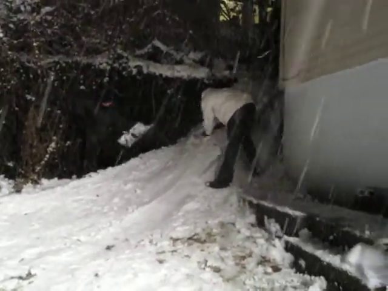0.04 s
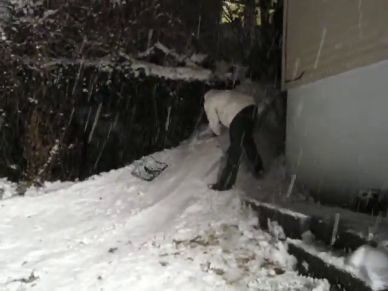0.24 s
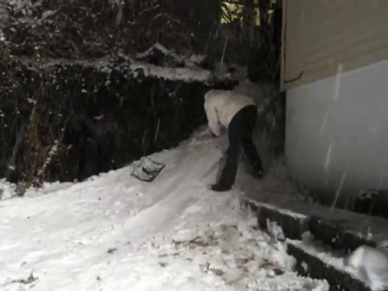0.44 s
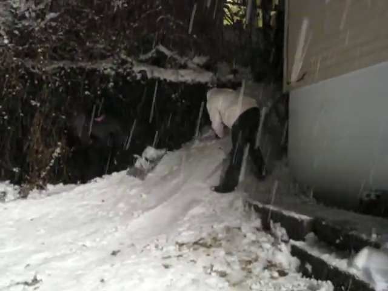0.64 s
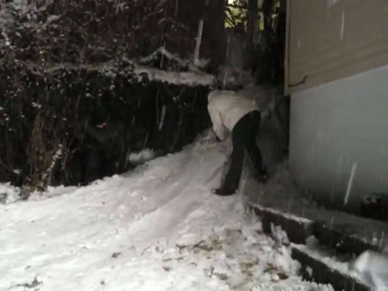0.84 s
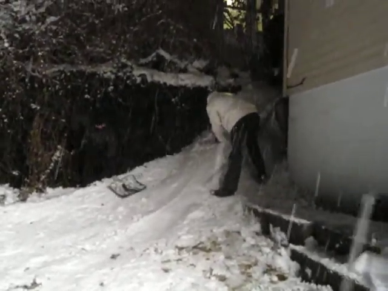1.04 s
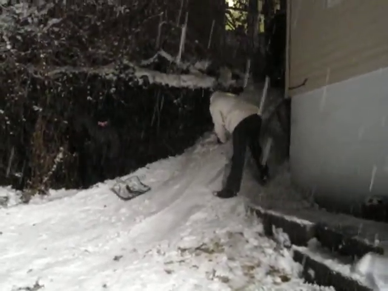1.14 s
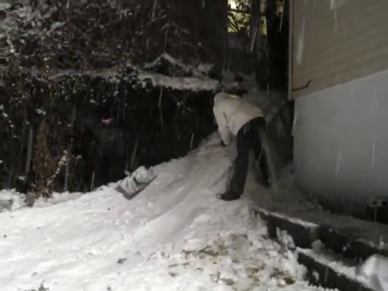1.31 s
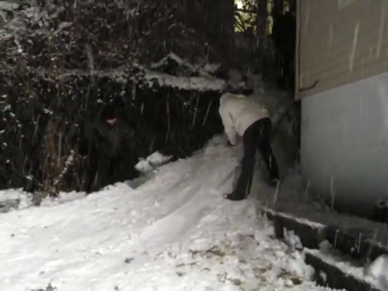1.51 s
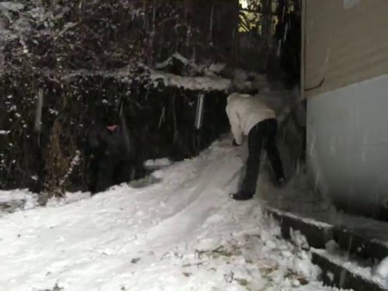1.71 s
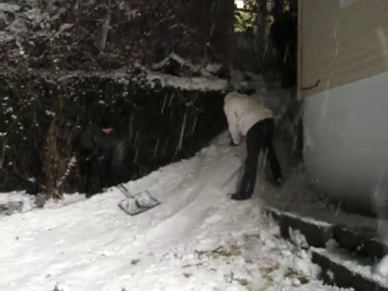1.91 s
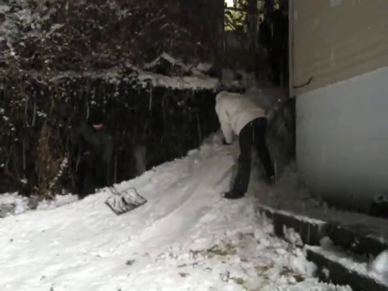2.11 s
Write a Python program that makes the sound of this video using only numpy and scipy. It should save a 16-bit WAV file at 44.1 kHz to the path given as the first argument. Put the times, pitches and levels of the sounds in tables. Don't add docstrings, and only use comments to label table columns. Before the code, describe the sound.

After a soft brush of loose snow, a very hard flat smack lands on a snow bank, then two crunchier blows with brief low rumble, faint pats between, a swish and light final pat, in quiet open air.

```python
import sys
import numpy as np
from scipy import signal
from scipy.fft import rfft, irfft, next_fast_len
from scipy.io import wavfile
from scipy.ndimage import map_coordinates

SR = 44100
rng = np.random.default_rng(int(sys.argv[2]) if len(sys.argv) > 2 else 0)


def decibels_to_gain(level_db):
    exponent = np.asarray(level_db, float) / 20
    return 10 ** exponent


def transcribe(u):
    v = np.clip(np.atleast_2d(u).T, -1, 1)
    q = np.round(v * 32767).astype(np.int16)
    wavfile.write(sys.argv[1], SR, q)


N = 94815

# frequency in Hz, level in dB per Hz.
NIGHT_TONE = [(90, -25), (150, -5), (300, -4), (600, -3.5), (900, -7), (1600, -9.5), (7600, -16),
              (16000, -28)]
# frequency in Hz, level in dB per Hz.
BREEZE_TONE = [(12, -14), (22, 0), (45, -2), (75, -4), (130, -11), (300, -20), (500, -40)]
# time in seconds, gain in dB.
AUTO_GAIN = [(0, 0), (.24, 0), (.33, -7), (.55, -9), (.9, -5), (1.1, -3), (1.4, -3), (1.8, -2), (2.15, 0)]
# start in seconds, level in dB, pitch in Hz, rise in seconds,
# fall to -60 dB in seconds.
HEAP_THUMPS = [(.004, -36, 135, .006, .08), (.2397, -.8, 188, .0006, .017), (.2447, -6, 185, .001, .009),
               (.2515, -21, 340, .001, .03), (.2645, -16, 215, .001, .013), (.9365, -8, 208, .001, .04),
               (.9368, -15, 470, .001, .02), (.9385, -20, 100, .002, .04), (.9555, -14, 325, .001, .035),
               (.982, -28, 195, .004, .075), (.958, -27, 50, .005, .06), (1.05, -34, 60, .01, .1),
               (1.232, -32, 200, .001, .015), (1.589, -31, 200, .001, .016), (1.762, -35, 230, .001, .016),
               (1.8314, -4.5, 340, .006, .03), (1.8325, -11, 105, .006, .045),
               (1.8375, -13, 175, .002, .022), (1.8535, -18, 250, .001, .02), (1.876, -26, 75, .004, .05),
               (1.945, -33, 270, .002, .02), (1.953, -30, 100, .003, .04), (2.1348, -17, 240, .001, .013),
               (2.1485, -28, 200, .001, .03)]
# middle in seconds, level in dB, rise in seconds,
# fall in seconds.
SNOW_SWISHES = [(.1, -49, .06, .04), (.205, -50, .015, .012), (.232, -50, .012, .01), (.9, -55, .06, .03),
                (1.0, -50, .02, .012), (1.08, -55, .03, .04), (1.17, -55, .012, .015),
                (1.47, -53, .08, .05), (1.605, -48, .025, .022), (1.8, -56, .03, .02),
                (1.89, -48, .015, .012), (2.04, -45, .05, .06)]
# frequency in Hz, level in dB per Hz.
POWDER_TONE = [(410, -32), (700, -2), (1020, -8), (2300, -3), (5120, -5), (10700, -13), (16000, -25)]
# middle in seconds, level in dB, rise in seconds,
# fall in seconds.
POWDER_SPRAYS = [
    (.1, -57, .05, .04),
    (.234, -47, .014, .008),
    (.9, -60, .04, .03),
    (.99, -54, .03, .012),
    (1.47, -60, .06, .05),
    (1.605, -57, .025, .022),
    (2.05, -54, .05, .035),
]
# frequency in Hz, level in dB per Hz.
MIST_TONE = [(2500, -30), (5000, -8), (8500, 0), (12000, -3), (16000, -18)]
# start in seconds, level in dB, centre in Hz, fall to -60 dB in seconds.
CRUST_CRACKS = [(.1836, -33, 1000, .02), (.1836, -32, 3800, .01), (.1985, -35, 9000, .006),
                (.1995, -23, 1200, .018), (.2388, -6, 3400, .006), (.2395, -11, 850, .035),
                (.2965, -34, 2500, .025), (.2965, -45, 9000, .008), (.9372, -11, 850, .055),
                (.9394, -14, 2500, .022), (.9405, -25, 8000, .012), (.952, -24, 4500, .012),
                (1.325, -43, 550, .07), (1.537, -41, 6000, .03), (1.743, -43, 13000, .005),
                (1.8285, -25, 900, .03), (1.832, -27, 8000, .02), (1.8365, -16, 5000, .012),
                (1.837, -14, 700, .04), (1.838, -13, 1700, .025), (1.853, -22, 2000, .03),
                (1.946, -33, 420, .06), (2.1335, -28, 500, .03), (2.135, -34, 1800, .02)]
# start in seconds, crystal level in dB, rumble level in dB,
# rise in seconds, fall to -60 dB in seconds.
HARD_BLOWS = [
    (.2385, -30, -28, .001, .15),
    (.9358, -22, -24, .003, .17),
    (1.828, -21, -23, .004, .12),
]
# frequency in Hz, level in dB per Hz.
CRYSTAL_TONE = [(300, -20), (550, -2), (1000, -4), (2000, -6), (4500, -14), (8000, -23), (11500, -26),
                (16000, -40)]
# frequency in Hz, level in dB per Hz.
HEAP_TONE = [(25, -3), (70, 0), (130, -5), (200, -3), (400, -3), (650, -12), (1200, -30)]

AFTER = np.arange(SR // 2) / SR


def unit(x):
    return x / np.sqrt(np.mean(x ** 2) + 1e-20)


def coloured(x, tone):
    size = next_fast_len(N + 8192)
    hz, db = np.transpose(tone)
    pitch = np.log(np.fft.rfftfreq(size, 1 / SR) + 1)
    gain = decibels_to_gain(np.interp(pitch, np.log(hz + 1), db, left=-120, right=-120))
    return unit(irfft(rfft(x, size) * gain, size)[:N])


def wobble(rate):
    points = rng.standard_normal(int(N * rate / SR) + 4)
    return map_coordinates(points, [np.arange(N) * rate / SR])


def swell(t, rise, t60, shape=1):
    return (1 - np.exp(-t / abs(rise))) * decibels_to_gain(-60 * (t / t60) ** shape)


def placed(events):
    track = np.zeros(N + SR)
    for start, sound in events:
        track[int(round(start * SR)):][:len(sound)] += sound
    return track[:N]


def strokes(rows):
    t = np.arange(N) / SR
    level = np.zeros(N)
    for middle, db, rise, fall in rows:
        width = np.where(t < middle, rise, fall)
        level += decibels_to_gain(db) * np.exp(-.5 * ((t - middle) / width) ** 2)
    return level


def grit(share, spread_db):
    happens = rng.random(N) < 4000 / SR
    size = decibels_to_gain(spread_db * rng.exponential(size=N))
    snaps = happens * rng.standard_normal(N) * size
    return share * unit(snaps) + (1 - share) * rng.standard_normal(N)


def night():
    hiss = decibels_to_gain(-49.5 + .8 * wobble(12)) * coloured(rng.standard_normal(N), NIGHT_TONE)
    breeze = decibels_to_gain(-46.5 + 2.5 * wobble(9)) * coloured(rng.standard_normal(N), BREEZE_TONE)
    gain_db = np.interp(np.arange(N) / SR, *np.transpose(AUTO_GAIN))
    return decibels_to_gain(gain_db) * (hiss + breeze)


def thumps():
    events = []
    for start, db, hz, rise, fall in HEAP_THUMPS:
        level = decibels_to_gain(db) * swell(AFTER, rise, fall, shape=2.4)
        events.append((start, level * np.sin(2 * np.pi * hz * AFTER)))
    crumble = decibels_to_gain(1.2 * wobble(700))
    return placed(events) * crumble


def swishes():
    powder = decibels_to_gain(1.2 * wobble(60)) * coloured(grit(.25, 2.5), POWDER_TONE)
    mist = coloured(grit(.2, 2.1), MIST_TONE)
    return strokes(SNOW_SWISHES) * powder + strokes(POWDER_SPRAYS) * mist


def crack(hz, t60):
    t = AFTER[:4096]
    f = np.fft.rfftfreq(len(t), 1 / SR)
    width = hz * 1.1
    ring = 1j * f * width / (hz * hz - f * f + 1j * f * width)
    splash = decibels_to_gain(-23) * 1j * f / (hz + 1j * f) / (1 + 1j * f / (3.2 * hz)) ** 2
    snap = swell(t, .0003, t60) * rng.standard_normal(len(t))
    burst = irfft(rfft(snap) * (ring ** 2 + splash))
    return burst / np.abs(burst).max()


def cracks():
    return placed((start, decibels_to_gain(db) * crack(hz, t60)) for start, db, hz, t60 in CRUST_CRACKS)


def crush():
    crackles, rumbles = [], []
    for start, crystal_db, rumble_db, rise, t60 in HARD_BLOWS:
        crackles.append((start, decibels_to_gain(crystal_db) * swell(AFTER, rise, t60)))
        rumbles.append((start, decibels_to_gain(rumble_db) * swell(AFTER, 3 * rise, 2.1 * t60)))
    crystals = decibels_to_gain(1.8 * wobble(200)) * coloured(grit(.5, 1.6), CRYSTAL_TONE)
    heap = coloured(rng.standard_normal(N), HEAP_TONE)
    return placed(crackles) * crystals + placed(rumbles) * heap


def scene():
    return (night() + thumps() + swishes() + cracks() + crush())[None]


def band_limit(x):
    return signal.sosfilt(signal.butter(12, 16200, fs=SR, output="sos"), x)


def record(dry):
    ceiling, hardness = .72, 6
    held = dry / (1 + np.abs(dry / ceiling) ** hardness) ** (1 / hardness)
    treble_limit = signal.butter(N=8, Wn=15700, fs=SR, output="sos")
    mix = signal.sosfilt(treble_limit, held)
    return band_limit(mix)


dry = scene()
out = record(dry)
transcribe(out)
```